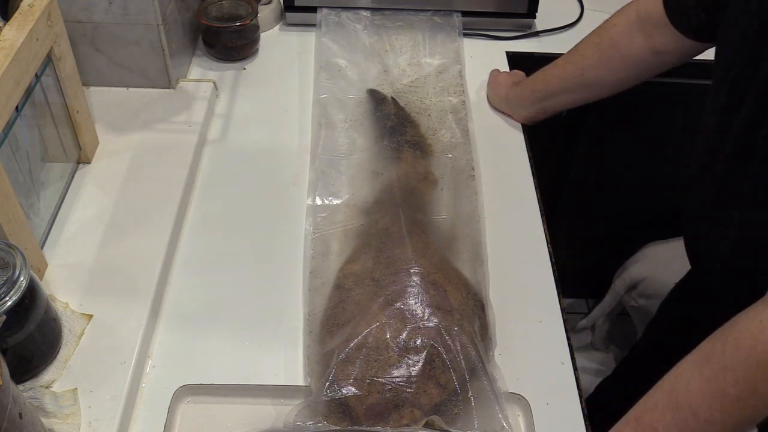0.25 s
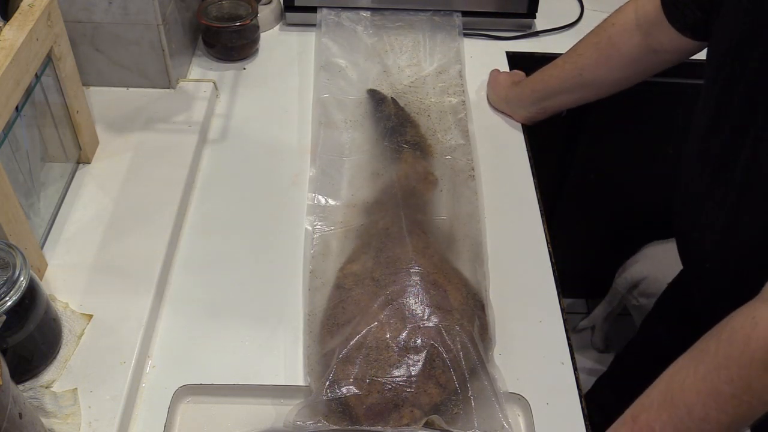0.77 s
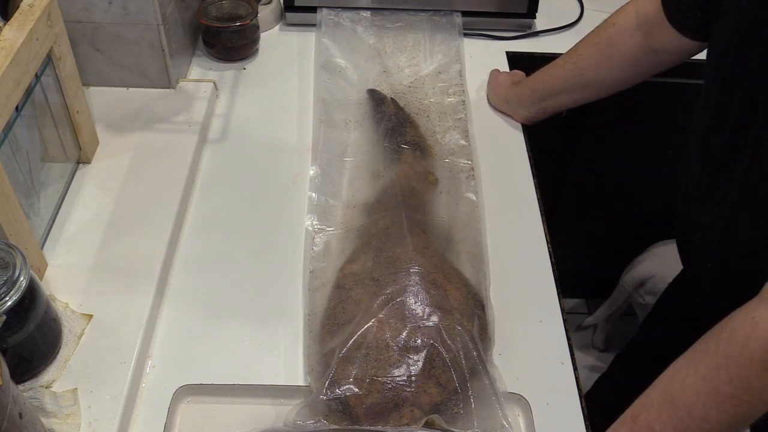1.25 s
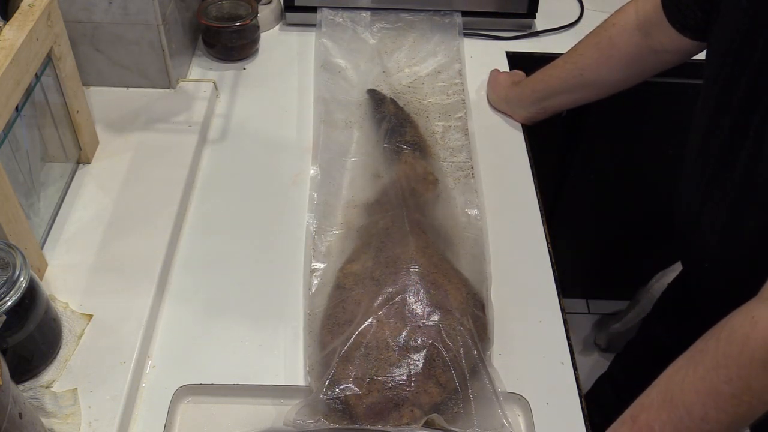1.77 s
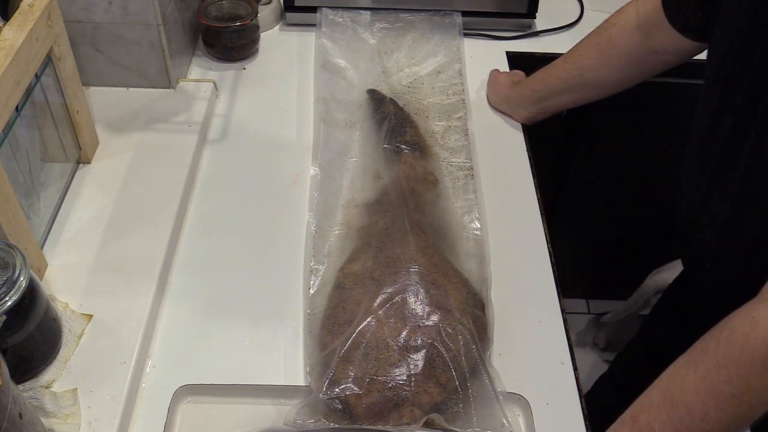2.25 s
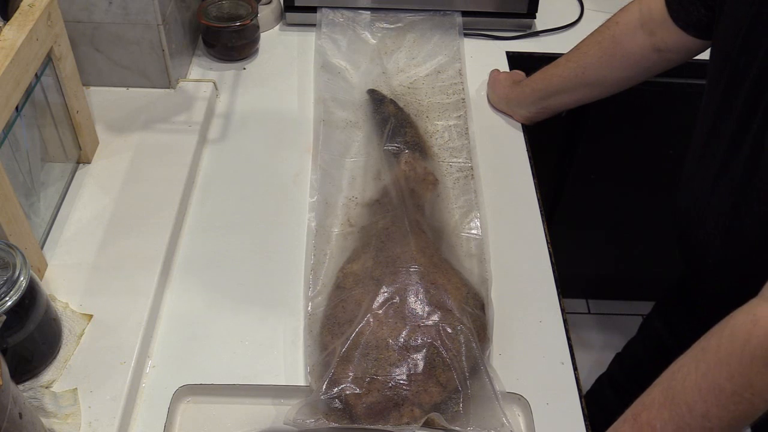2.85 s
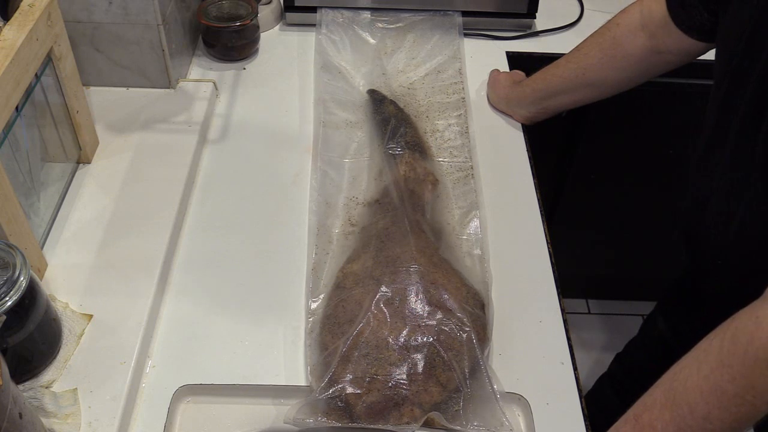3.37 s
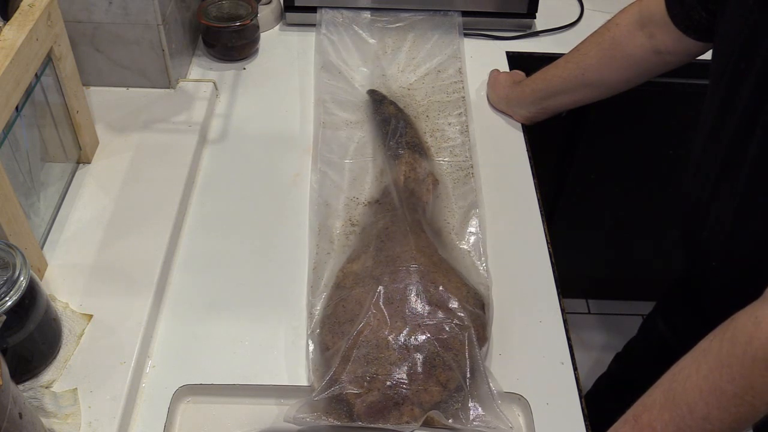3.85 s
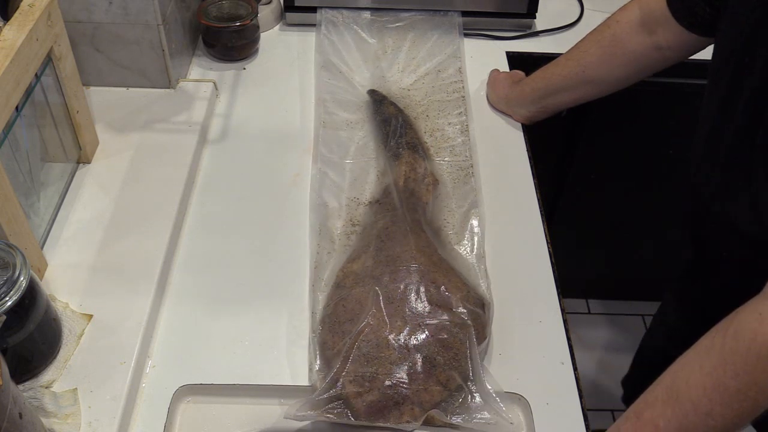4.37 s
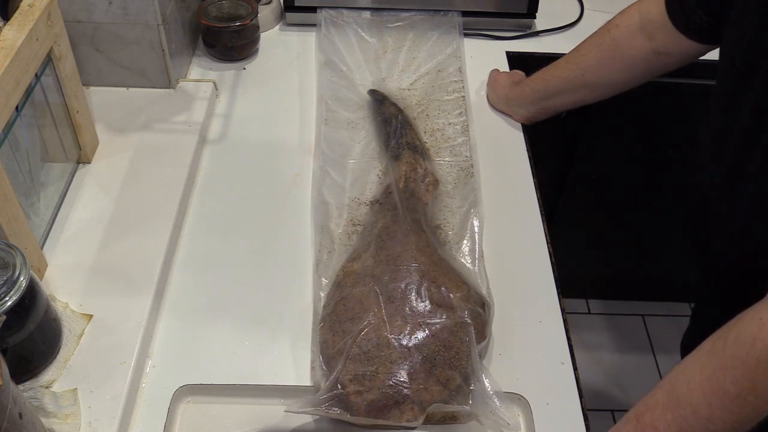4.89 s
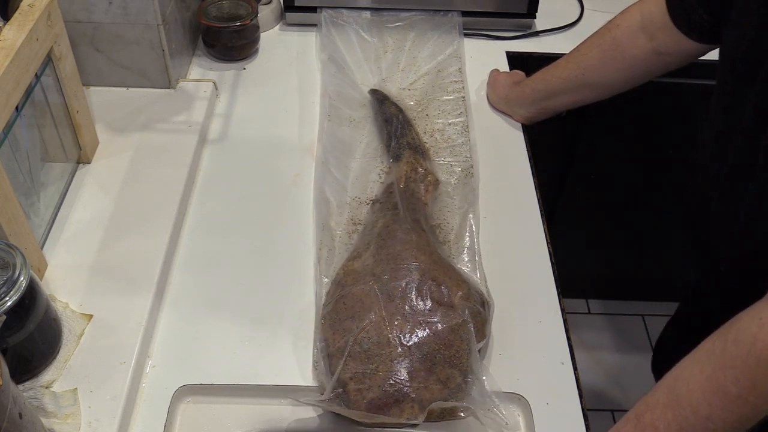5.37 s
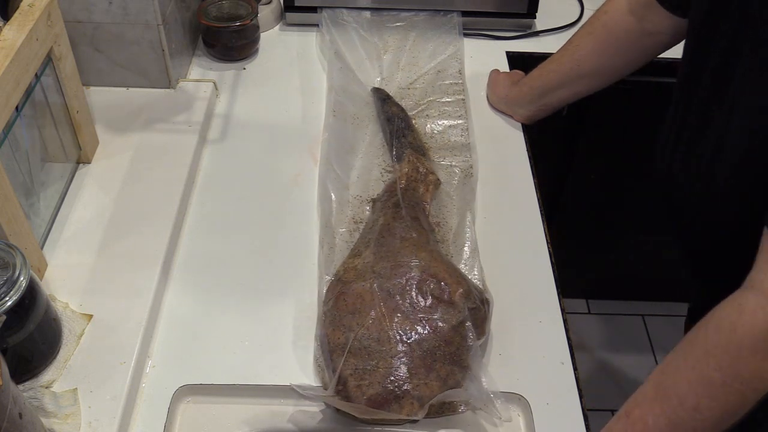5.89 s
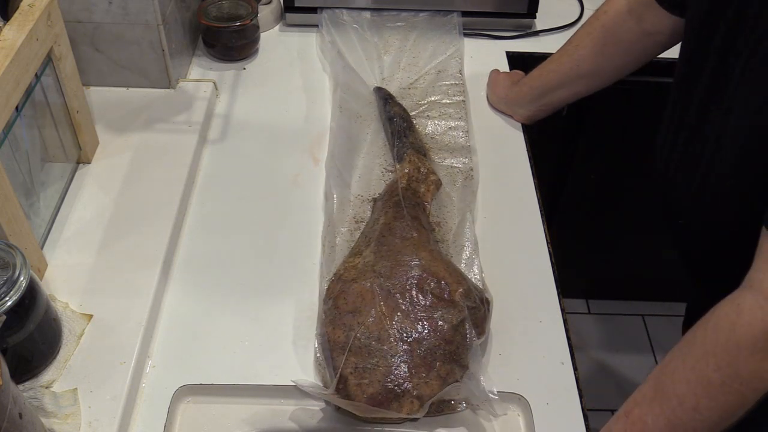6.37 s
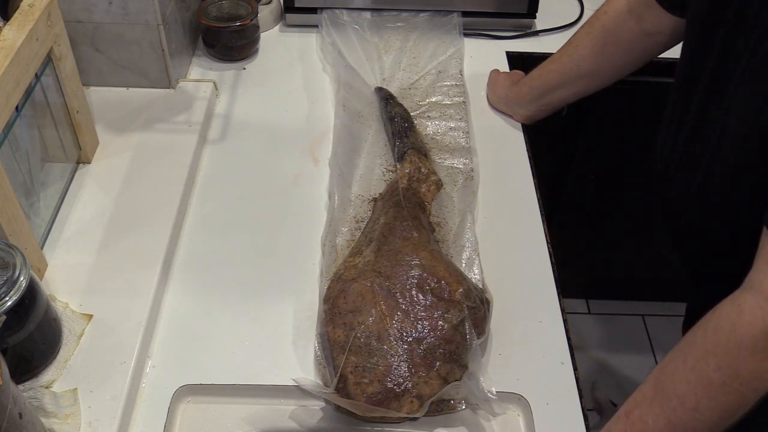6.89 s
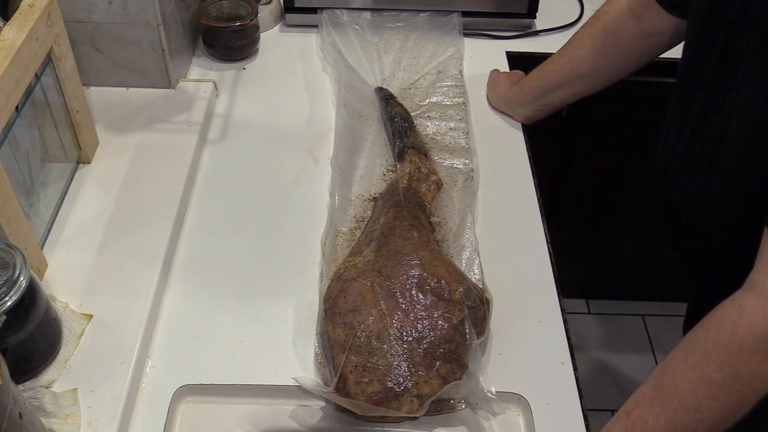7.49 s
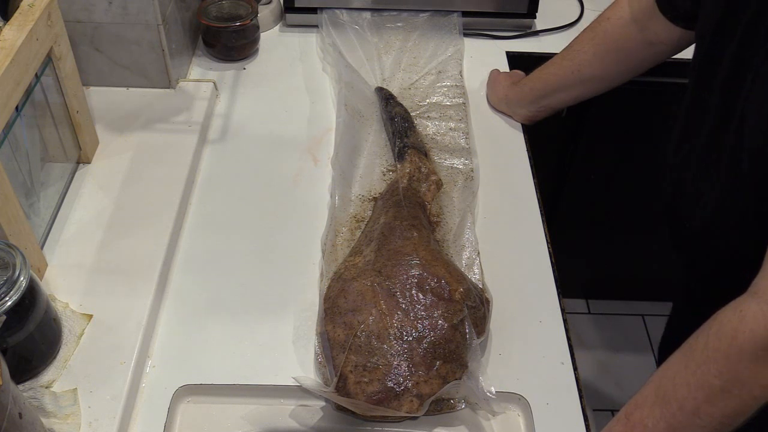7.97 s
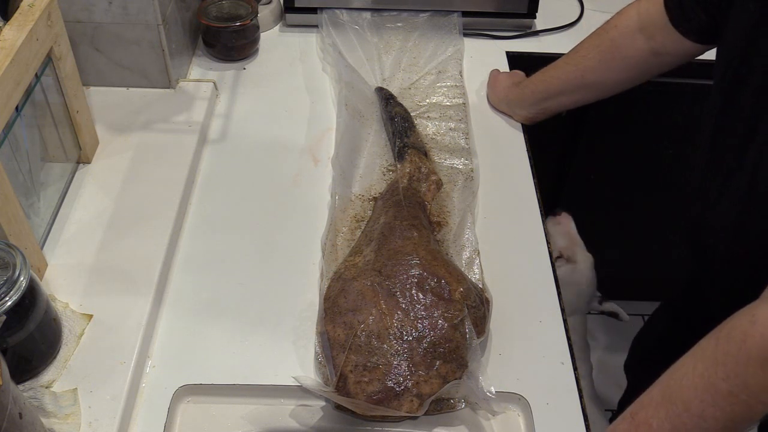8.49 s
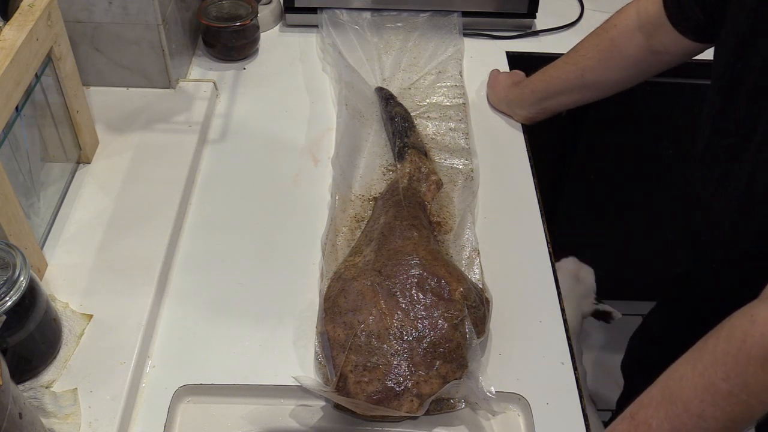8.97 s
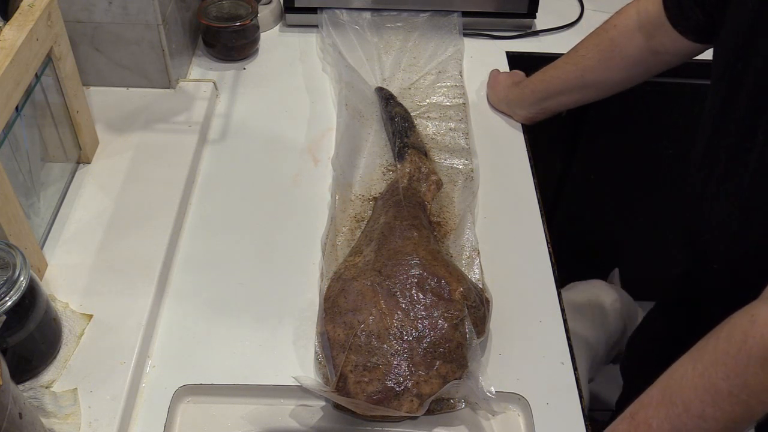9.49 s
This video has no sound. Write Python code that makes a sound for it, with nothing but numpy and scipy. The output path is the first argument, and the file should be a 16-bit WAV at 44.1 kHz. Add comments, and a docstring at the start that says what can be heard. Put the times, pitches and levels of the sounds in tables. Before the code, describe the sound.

In a kitchen, a countertop vacuum sealer draws air from a plastic bag around a large piece of meat. Its pump buzzes loudly and close, with a plastic-cased drone, puffing hiss and fast clatter, fluttering with small hiccups. Past the middle it climbs in pitch and grows drier and more tonal. It then cuts off suddenly, leaving quiet room air, faint rustles and one tiny squeak.

```python
"""A countertop vacuum pump empties a bag in a kitchen: shaft orders ring in its plastic housing over puffs of
exhaust noise and a clatter that repeats each turn. Throughout, splices skip part of a turn, so it flutters.
As the bag empties the motor speeds up, single orders surge and the hiss fades. Then the pump sound is cut short
by an edit, treble first, and quiet room noise is left with faint rustles (grain bursts) and one squeak (a sine)."""
import sys
import numpy as np
from scipy import signal
from scipy.fft import irfft
from scipy.io import wavfile
from scipy.ndimage import uniform_filter1d

SR = 44100
rng = np.random.default_rng(int(sys.argv[2]) if len(sys.argv) > 2 else 0)


def wav_out(sig):
    """Save sig, one row per channel (or a flat mono array), as 16-bit PCM at SR to the path in sys.argv[1]."""
    wavfile.write(sys.argv[1], SR, np.round(np.clip(np.atleast_2d(sig).T, -1, 1) * 32767).astype(np.int16))


def voltage_ratio(decibels):
    """Convert decibels (scalar or array-like) to amplitude ratios, 20 dB per decade."""
    exponent = np.asarray(decibels, float) / 20
    return 10 ** exponent


N = 429526

CUT_S = 9.031  # an edit cuts the pump sound short
TOP_ORDER = 72  # highest shaft order in the hum; the rattle holds those above
# Motor speed. Each row: time in seconds, shaft turns per second.
SHAFT_SPEED = [(0.0, 36.3), (1.0, 36.2), (2.4, 36.2), (4.0, 36.25), (5.4, 36.35), (5.9, 36.55),
               (6.21, 37.4), (6.51, 39.1), (6.66, 39.7), (6.9, 41.3), (7.1, 41.5), (7.25, 42.1),
               (7.5, 42.75), (8.05, 43.25), (9.1, 43.4)]
# Progress of the bag. Each row: time in seconds, stage from 0 (full) to 3 (empty).
BAG_STAGE = [(0, 0.), (2, .1), (3.4, .9), (5.4, 1.05), (5.9, 1.5), (6.2, 1.95), (7.1, 2.1), (7.55, 2.95),
             (9.1, 3.)]
# Source levels. Each row: time in seconds, hum offset in dB, noise offset in dB.
SOURCE_LEVELS = [(0.0, 0.5, -26.5), (0.25, 1, -26), (5.88, 0, -28), (7.51, 1.5, -35), (8.89, 0.5, -36),
                 (9.02, 1, -37)]
# Stereo likeness of the pump. Each row: frequency in Hz, left-right correlation (-1 to 1).
PUMP_LIKENESS = [(60, 0.9), (150, 0.96), (380, 0.95), (950, 0.44), (2380, 0.38), (5980, 0.54),
                 (15000, 0.99)]
# Housing resonances. Each row: centre in Hz, width in Hz, peak in dB over the flat part.
HOUSING_MODES = [(255.6, 13.4, 20), (317.4, 33, 14.5), (401, 14.5, 13.5), (531, 13.4, 17), (694, 23.4, 19),
                 (837, 11, 19.5), (906, 34, 12.5), (931, 26, 17), (1028, 14, 16), (1206.4, 22.6, 19.5),
                 (1320, 41, 17), (1564, 25, 14.5), (1723, 206, 9.5), (2680, 124, 13)]


def evened(x):
    """Scales to rms 1."""
    return x / np.sqrt(np.mean(x ** 2) + 1e-20)


def read(points, hz):
    """Reads a spectrum on a log-frequency axis."""
    f, value = np.transpose(points)
    return np.interp(np.log(hz + 1), np.log(f + 1), value)


def curve(rows, t, column=1):
    """Reads one column of a table over time."""
    rows = np.array(rows)
    return np.interp(t, rows[:, 0], rows[:, column])


def peaks_gain(modes, hz):
    """Gain of resonances whose power adds to a flat response."""
    return np.sqrt(1 + sum(voltage_ratio(db) ** 2 / (1 + (2 * (hz - f) / w) ** 2) for f, w, db in modes))


def noise(db_field, same, patchy_db, size):
    """Two-channel noise from random short-time spectra; db_field(hz, t) gives the level."""
    hz = np.fft.rfftfreq(size, 1 / SR)[:, None]
    t = np.arange(4 * N // size + 5) * size / 4 / SR
    a, b, c, d, patch = rng.standard_normal((len(t), len(hz), 5)).T
    patch = evened(uniform_filter1d(uniform_filter1d(patch, size=5, axis=0), size=12, axis=1))
    like = np.clip(read(same, hz), -1, 1)
    left, other = a + 1j * b, c + 1j * d
    spectra = np.array([left, like * left + np.sqrt(1 - like ** 2) * other])
    spectra *= voltage_ratio(db_field(hz, t) + patchy_db * patch)
    return signal.istft(spectra, nperseg=size, noverlap=3 * size // 4)[1][:, :N]


def room():
    """Quiet kitchen air: shaped noise with a slightly swaying level and one brief dip at a splice."""
    # Spectrum shape. Each row: frequency in Hz, relative density in dB per Hz.
    air_shape = [(18, -51), (30, -27), (92, -0.5), (292, -7.5), (410, -8), (639, -5), (897, -4.5),
                 (1200, -9.5), (13300, -30.5), (15500, -35)]
    # Stereo likeness. Each row: frequency in Hz, left-right correlation (-1 to 1).
    likeness = [(60, 0.97), (240, 0.45), (950, -0.42), (3770, 0.46), (15000, 0.55)]
    # Level sway and splice dip. Each row: time in seconds, offset in dB.
    sway = [(0, 2), (9.33, 1), (9.36, 3), (9.42, 0.), (9.6, 1), (9.645, 3), (9.65, -7), (9.67, -1.),
            (9.74, 1)]
    base_db = -55
    still = evened(noise(lambda hz, t: read(air_shape, hz) + 0 * t, likeness, patchy_db=2.5, size=1024))
    return voltage_ratio(base_db + curve(sway, np.arange(N) / SR)) * still


def rustles():
    """Plastic crackles and rustles of bag and floor: band-passed grains of uneven size, fast rise, slow decay."""
    # Bursts. Each row: start in seconds, level in dB before the envelope, centre in Hz, width in Hz,
    # length in seconds.
    bursts = [(5.646, -18, 1840, 600, .012), (5.641, -23, 3500, 4500, 0.011),
              (5.935, -24, 3500, 3970, 0.019), (6.786, -43, 12000, 5000, .012),
              (9.042, -48, 1400, 1600, 0.078), (9.17, -61, 2830, 1200, .02),
              (9.288, -53, 3000, 6000, 0.033), (9.376, -60, 3600, 2000, .015),
              (9.438, -52, 3520, 2500, 0.052), (9.441, -54, 6800, 2500, .03), (9.449, -54, 900, 900, .05)]
    out = np.zeros((2, N))
    for s, db, hz, width, length in bursts:
        u = np.linspace(0, 1, round(length * SR))
        uneven_db = 2.8 * rng.exponential(1, 4000)
        grains = (rng.standard_normal((2, 4000)) * voltage_ratio(uneven_db))[:, :len(u)]
        grains = grains + 2.5 * grains[::-1]  # channels partly alike
        edges_hz = [max(hz - width / 2, 100), hz + width / 2]
        burst = signal.sosfilt(signal.butter(2, edges_hz, "bandpass", fs=SR, output="sos"), grains)
        envelope = np.minimum(u / .12, 1) * np.sqrt(2 * (1 - u))
        out[:, round(s * SR):][:, :len(u)] += voltage_ratio(db) * evened(burst) * envelope
    return out


def squeak():
    """One thin squeak: a sine of falling, shaky pitch, alike in both channels."""
    # Glide. Each row: time in seconds, peak level in dB, frequency in Hz before the shake.
    glide = [(9.58, -75, 8300), (9.595, -64, 8250), (9.62, -60, 7900), (9.635, -75, 7750)]
    t = np.arange(glide[0][0], glide[-1][0], 1 / SR)
    shake_hz = 900 * uniform_filter1d(rng.standard_normal(4000), size=40)[:len(t)]
    phase = 2 * np.pi * np.cumsum(curve(glide, t, column=2) + shake_hz) / SR
    out = np.zeros((2, N))
    out[:, round(t[0] * SR):][:, :len(t)] += voltage_ratio(curve(glide, t)) * np.sin(phase)
    return out


def splices():
    """Times and sizes of all skips: nearly evenly paced slots, some left out, and the hiccups."""
    # Skips on offer. Each row: valid from in seconds, four skips in shaft turns.
    offers = np.array([(0, -.46, .452, -.457, -.125), (5.7, .488, .488, -.49, -.49),
                       (7.35, -.333, -.333, -.18, .5)])
    # Ill-fitting splices, heard as hiccups. Each row: time in seconds, skip in shaft turns.
    hiccups = np.array([(.678, .354), (1.343, .354), (1.689, .209), (2.26, .159), (2.68, .159),
                        (3.072, .159), (3.661, -.299), (5.986, .304), (6.11, -.294), (6.213, .304),
                        (6.497, -.356), (6.676, -.408), (7.252, .342), (7.317, .296)])
    slot_s, scatter_s, chance = .09, .02, .85
    slot = np.arange(1, round(CUT_S / slot_s))
    taken, choice, late = rng.random((len(slot), 3)).T
    s = slot * slot_s + scatter_s * (2 * late - 1)
    skip = offers[np.searchsorted(offers[:, 0], s) - 1, 1 + (4 * choice).astype(int)]
    free = abs(s[:, None] - hiccups[:, 0]).min(1) > slot_s / 2  # clear of hiccups
    rows = np.vstack([np.c_[s, skip][free & (taken < chance)], hiccups])
    return rows[np.argsort(rows[:, 0])]


def shaft(t, skips):
    """Turns made so far (integral of speed), and the sum of all skips so far."""
    s, skip = np.transpose(skips)
    turns = np.cumsum(curve(SHAFT_SPEED, t)) * (t[1] - t[0])
    return turns, np.append(0, np.cumsum(skip))[np.searchsorted(s, t)]


def colour_db(hz, t):
    """Spectrum of the pump noise; it dulls as the bag runs out of air."""
    # Exhaust with air flowing. Each row: frequency in Hz, relative density in dB per Hz.
    airy = [(30, -37), (60, -26), (150, -13), (300, -7), (500, -12.5), (850, 1.5), (1500, 1.5), (2200, -1),
            (3500, -4.5), (5500, -2.5), (6600, -4.5), (9000, -10), (12000, -19.5), (15500, -29)]
    # Valves and bearings alone. Each row: frequency in Hz, relative density in dB per Hz.
    airless = [(30, -26), (60, -15), (150, 4), (300, -9), (600, 5), (1000, 11), (1700, 14.5), (2200, 9.5),
               (2700, 4.5), (3900, 0), (6000, -1), (8400, -7), (12400, -22.5), (15500, -31)]
    # Exhaust passage resonances. Each row: centre in Hz, width in Hz, peak in dB with air flowing.
    whistles = [(2520, 77, 7), (2642, 38, 5), (3066, 43, 4.5), (3640, 200, 1.5), (4600, 43, 5),
                (6236, 79, 8.5), (6800, 104, 11.5), (7520, 166, 7.5), (8270, 230, 5), (10550, 39, -19),
                (12950, 80, 6), (13900, 100, 5)]
    dryness = np.clip((curve(BAG_STAGE, t) - 1.3) / 0.98, 0, 1)
    airy_db = read(airy, hz) - read(airy, 6400)
    dry_db = read(airless, hz) - read(airless, 6500)
    whistle_db = (1 - 0.45 * dryness) * 20 * np.log10(peaks_gain(whistles, hz))
    return (1 - dryness) * airy_db + dryness * dry_db + whistle_db + curve(SOURCE_LEVELS, t, column=2)


def air(skips):
    """Exhaust and valve noise, puffing twice a turn, with a fixed random ripple in its spectrum."""
    ripple_db = 2.34 * evened(uniform_filter1d(rng.standard_normal(513), size=3))[:, None]
    turns = sum(shaft(np.arange(N) / SR, skips))
    puff = 1 + 0.21 * np.cos(4 * np.pi * turns) + 0.13 * np.cos(8 * np.pi * turns)
    puff = uniform_filter1d(puff, size=60)  # softens the skips
    flutter = evened(uniform_filter1d(uniform_filter1d(rng.standard_normal(N), size=700), size=700))
    lean = voltage_ratio(np.array([[.3], [-.3]]))

    def level_db(hz, t):
        boxy_db = 20 * np.log10(peaks_gain(HOUSING_MODES, hz)) - 6 * (hz < 2900)
        return 0.2 * boxy_db + colour_db(hz, t) + ripple_db  # a fifth of the housing's colour

    hiss = noise(level_db, PUMP_LIKENESS, patchy_db=1.5, size=1024)
    return voltage_ratio(-22.0) * lean * puff * voltage_ratio(0.56 * flutter) * hiss


def rattle(skips, count=12, size=8192):
    """High clatter of valves and bearings that repeats each turn; its pattern drifts with time."""
    # Clatter level. Each row: time in seconds, dB of each order relative to the noise colour.
    clatter_level = [(0, -40.5), (6, -38.5), (7, -34), (7.8, -34.5), (9.1, -30.5)]
    t = np.arange(N) / SR
    orders = np.arange(TOP_ORDER + 1, 330)
    spectra = np.zeros((count, 2, size // 2 + 1), complex)
    draws = rng.standard_normal((count, 2, len(orders), 2)) @ [1, 1j]
    when = np.linspace(0, CUT_S, count)
    levels_db = np.array([colour_db(orders * curve(SHAFT_SPEED, s), s) + curve(clatter_level, s) for s in when])
    # some orders stand out, even ones most (two strokes a turn); the lowest are raised
    uneven_db = 2.1 * rng.standard_normal(len(orders)) - 7.3 * (orders % 2)
    uneven_db += 9.2 * np.exp(-(orders - 73) / 19.0)
    alike = draws + 0.57 * draws[:, ::-1]
    spectra[..., orders] = alike * voltage_ratio(levels_db + uneven_db)[:, None] * size
    patterns = irfft(spectra)  # one turn each
    place = (sum(shaft(t, skips)) % 1 * size).astype(int)
    early, share = np.divmod(np.interp(t, when, range(count)) * (1 - 1e-9), 1)
    early = early.astype(int)
    fading = patterns[early, :, place].T * np.cos(np.pi / 2 * share)
    rising = patterns[early + 1, :, place].T * np.sin(np.pi / 2 * share)
    return fading + rising


def swell(order, t):
    """Extra amplitude of one order that surges while the bag closes and after."""
    # Surges. Each row: centre in seconds, length in seconds, order, peak in dB before the hum offset.
    surges = [(5.8, 0.97, 26, -28.5), (5.95, 0.88, 10, -29.5), (5.944, 0.35, 33, -28), (6.06, 0.4, 24, -31),
              (6.287, 0.25, 22, -22), (6.703, 0.21, 17, -31.5), (6.778, 0.29, 10, -26.5),
              (6.6, 0.27, 8, -30), (6.828, 0.25, 25, -28), (5.8, 0.82, 4, -37), (7.2, 0.71, 4, -36),
              (6.95, .4, 6, -26.5), (7.9, 0.52, 40, -28.5), (6.9, 0.58, 14, -38.5), (7.068, 0.37, 29, -25),
              (7.03, 0.3, 38, -29.5)]
    return sum(voltage_ratio(db) * np.clip(2 - 4 * abs(t - s) / length, 0, 1)
               for s, length, k, db in surges if round(k) == order)


def drives_db():
    """How hard every order drives the housing with the bag full, shrinking and empty."""
    # Strong orders. Each row: order, dB with the bag full, dB shrinking, dB empty.
    strong = [(1, -73, -78, -78), (2, -48.5, -49.5, -53.5), (3, -58, -62, -50), (4, -53, -44, -41),
              (5, -54, -59, -57), (6, -45.5, -47.5, -41), (7, -56.5, -51.5, -54), (8, -44.5, -48.5, -43.5),
              (9, -42.5, -43, -52.5), (10, -70, -44, -47), (11, -45, -49, -41.5), (12, -58, -50, -56),
              (13, -53, -55.5, -51), (14, -70, -53.5, -50.5), (15, -56, -58.5, -60), (16, -48, -42, -68),
              (19, -56.5, -56, -49.5), (20, -54, -41, -51), (21, -48, -55, -43.5), (22, -49, -66, -48),
              (23, -48.5, -56.5, -42.5), (24, -37.5, -36.5, -55), (25, -50.5, -52.5, -43),
              (26, -48, -53, -50), (27, -54, -59, -38.5), (28, -53, -54.5, -48), (29, -43.5, -52, -54.5),
              (31, -50.5, -42.5, -52.5), (33, -51, -47.5, -63), (36, -69, -63, -44.5), (37, -62, -50, -48),
              (38, -51, -53, -45.5), (40, -64, -64, -42.5), (42, -47, -45, -46.5), (45, -49, -48, -42),
              (46, -50, -54, -50), (56, -44, -50, -40.5), (60, -67, -51, -47.5), (62, -70, -57, -50)]
    # All other orders, mean before colour and scatter: dB with the bag full, dB shrinking, dB empty.
    weak_db = (-53, -54, -53.5)
    # Colour of the other orders. Each row: frequency in Hz, offset in dB.
    weak_colour = [(450, 0.), (640, -3.), (900, -0.5), (1900, 0.), (2200, -2), (2600, -0.5)]
    scatter_db = 4.5
    table = np.array(weak_db) + scatter_db * rng.standard_normal((TOP_ORDER, 3))
    first, last = SHAFT_SPEED[0][1], SHAFT_SPEED[-1][1]
    table += read(weak_colour, np.outer(np.arange(1, TOP_ORDER + 1), [first, first, last]))
    for order, *levels_db in strong:
        table[round(order) - 1] = levels_db
    return table


def hum(skips, step=5, slow=16):
    """Tones at multiples of the shaft speed, through the housing; splices cross-fade to another point of the turn."""
    # Stereo lean. Each row: frequency in Hz, left over right in dB.
    lean = [(60, 2.5), (180, 0), (550, -1), (1650, 0.5), (4970, 2), (15000, 1.0)]
    splice_s = 0.015
    t = np.arange(N // step + 1) * step / SR  # reduced rate
    coarse = t[::slow]  # control rate
    out = np.zeros((2, len(t)))
    turns, skipped = shaft(t, skips)[0], shaft(coarse, skips)[1]
    fade = max(round(splice_s / coarse[1]), 1)
    stage, speed = curve(BAG_STAGE, coarse), curve(SHAFT_SPEED, coarse)
    struggle = np.clip(1.5 - 2.5 * abs(stage - 2), 0, 1)  # the load changes unevenly while the bag closes
    draws = rng.random((TOP_ORDER, 2))
    wander = rng.standard_normal((TOP_ORDER, 4, len(coarse)))
    wander = evened(uniform_filter1d(uniform_filter1d(wander, size=20), size=20))
    for k, levels_db in enumerate(drives_db(), 1):
        start, tilt = np.exp(2j * np.pi * draws[k - 1])
        # low orders stay in step, each a little later than the one below, so the thud spreads over the turn
        start = start ** min(.012 * k, 1) * np.exp(-2j * np.pi * .115 * k ** 2)
        a, b, c, d = wander[k - 1]
        hz = k * speed
        usual = voltage_ratio(np.interp(stage, (0, 1, 3), levels_db)) * peaks_gain(HOUSING_MODES, hz)
        jump = np.exp(2j * np.pi * k * skipped)
        jump = uniform_filter1d(jump.real, fade) + 1j * uniform_filter1d(jump.imag, fade)
        loose = np.clip(.03 + .004 * k * (1 + 4 * struggle), 0, .95)  # high orders are less steady
        steady = np.hypot(usual * np.sqrt(1 - loose ** 2), swell(k, coarse))
        unsteady = usual * loose * (a + 1j * b) / np.sqrt(2)
        size = (steady + unsteady) * voltage_ratio(curve(SOURCE_LEVELS, coarse))
        mid = np.sqrt(2) * size * start * jump
        # each order reaches the two channels differently
        unlike = np.sqrt(.5 - .5 * np.clip(read(PUMP_LIKENESS, hz), -1, 1))
        side = 0.57 * unlike * (0.35 * tilt.real + 1j * np.sign(tilt.imag) + 0.22 * (c + 1j * d))
        spin = np.exp(2j * np.pi * k * turns)
        for channel, sign in enumerate((1, -1)):
            wave = mid * (1 + sign * side) * voltage_ratio(sign * read(lean, hz) / 2)
            out[channel] += (np.interp(t, coarse, wave) * spin).real
    return signal.resample_poly(out, step, 1, axis=1)[:, :N]


def edit_cut(pump):
    """Edit cut: the pump sound stops within about 36 ms, treble first."""
    fade_s, treble_decay_s, split_hz = 0.036, 0.0086, 600
    after = np.maximum(np.arange(N) / SR - CUT_S, 0)
    low = signal.sosfiltfilt(signal.butter(2, split_hz, fs=SR, output="sos"), pump)
    fade = np.sqrt(np.clip(1 - after / fade_s, 0, 1))
    return low * fade + (pump - low) * fade * np.exp(-after / treble_decay_s)


def scene():
    """Pump sound, cut short by an edit, over room and small noises."""
    skips = splices()
    pump = hum(skips) + air(skips) + rattle(skips)
    return edit_cut(pump) + room() + rustles() + squeak()


def top_cut(x):
    """Nothing passes above the cut-off."""
    return signal.sosfilt(signal.butter(12, 15660, fs=SR, output="sos"), x)


def record(dry):
    """Band limit at 15.7 kHz by a linear-phase low-pass."""
    mix = signal.oaconvolve(dry, signal.firwin(255, 15700, fs=SR)[None], "same")
    return top_cut(mix)


dry = scene()
out = record(dry)
wav_out(out)
```